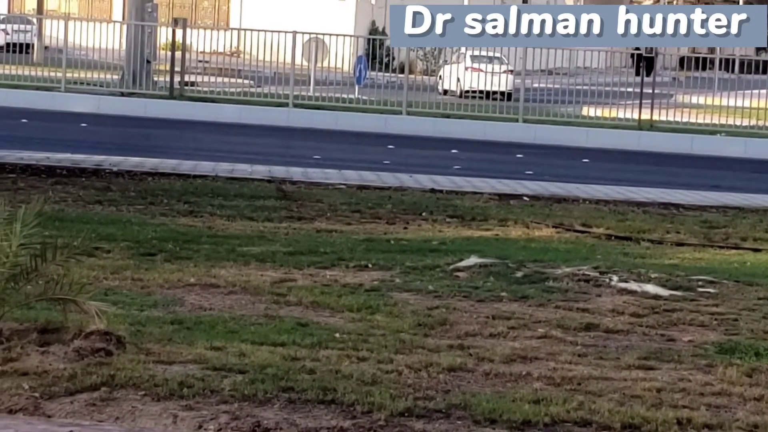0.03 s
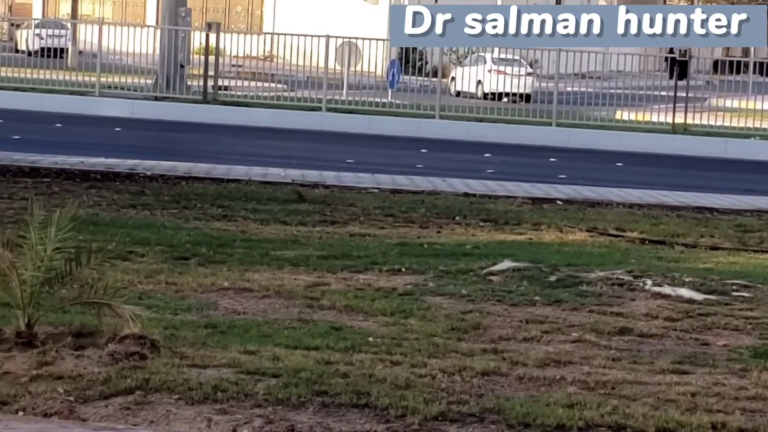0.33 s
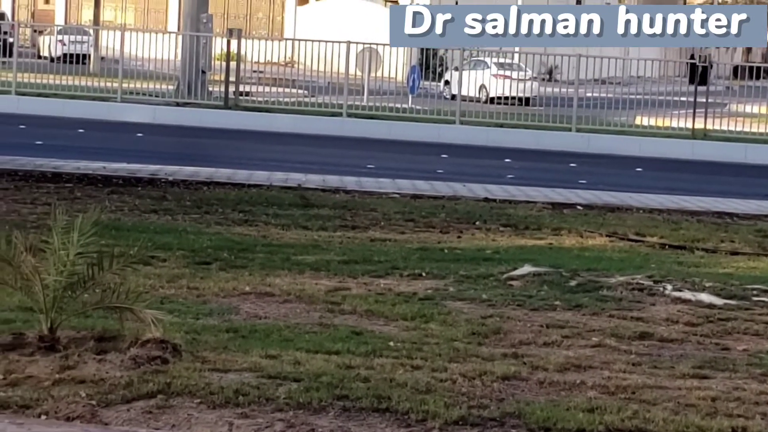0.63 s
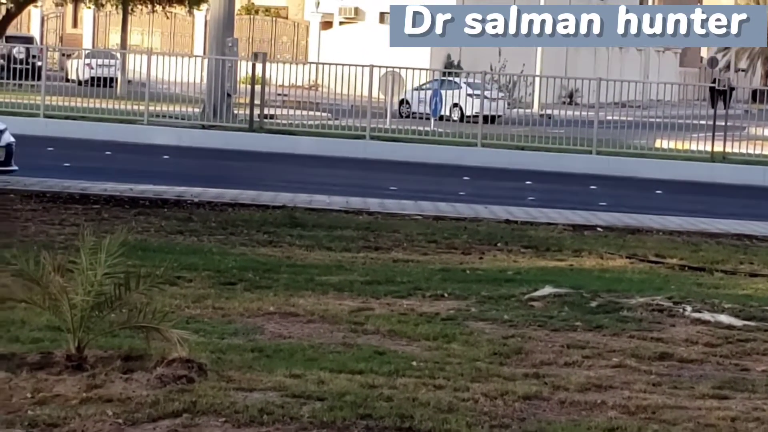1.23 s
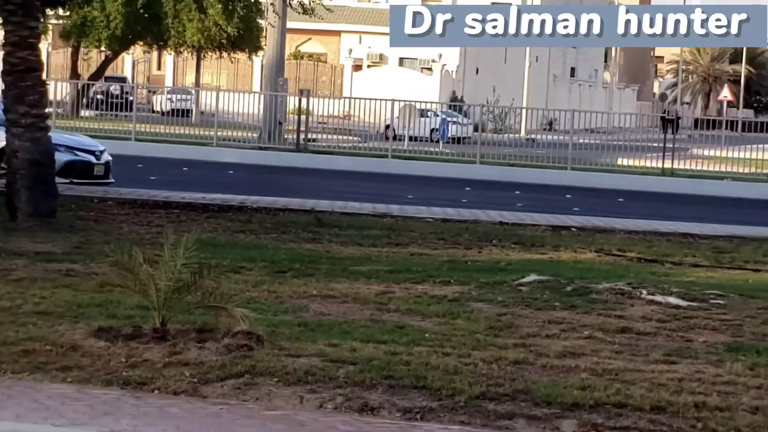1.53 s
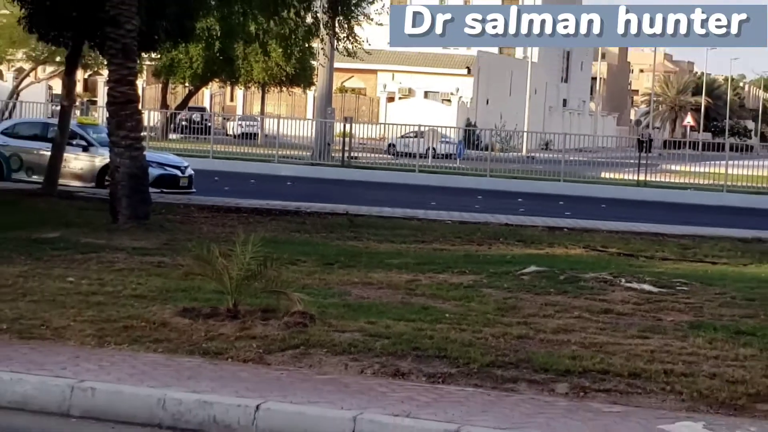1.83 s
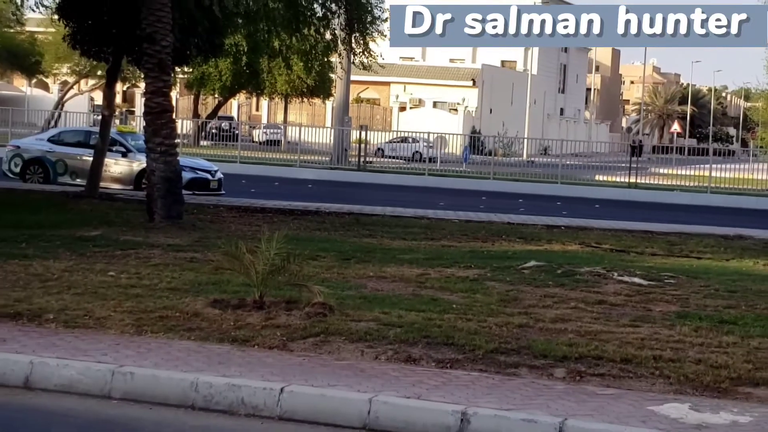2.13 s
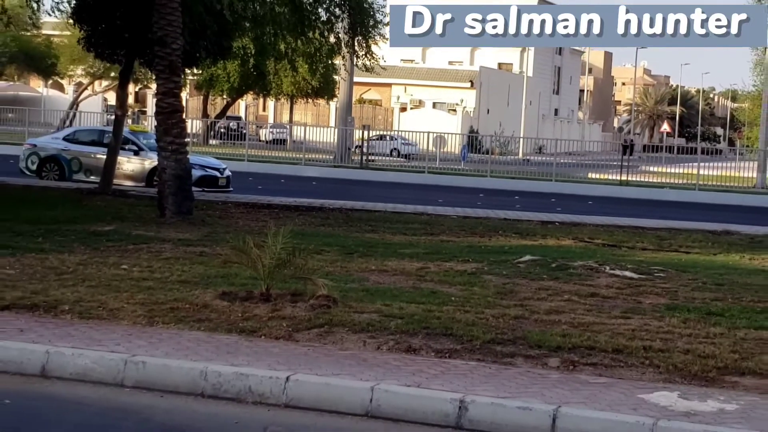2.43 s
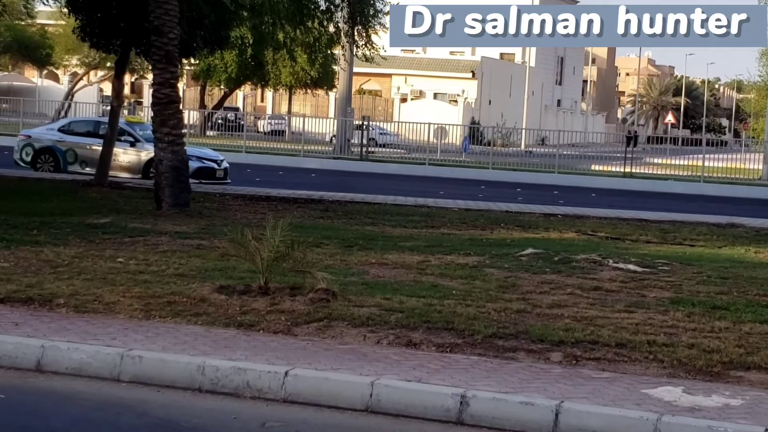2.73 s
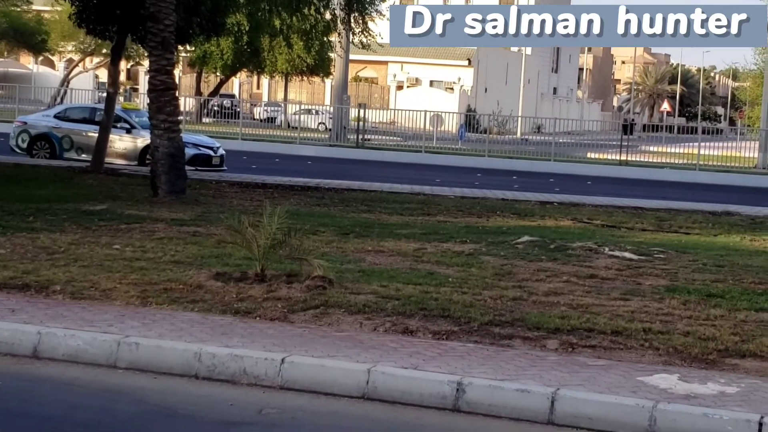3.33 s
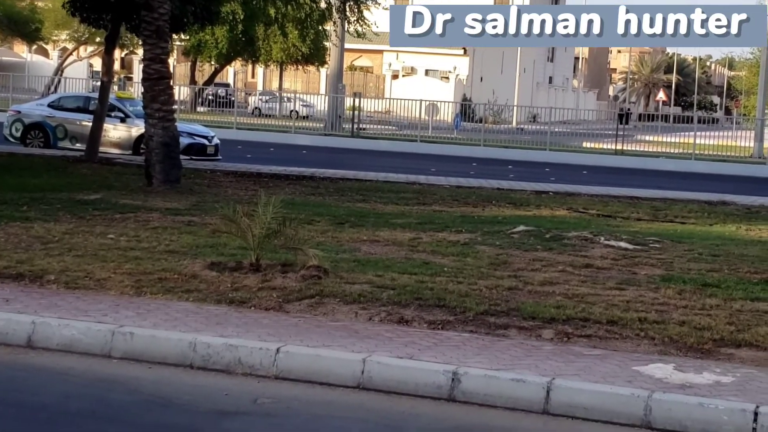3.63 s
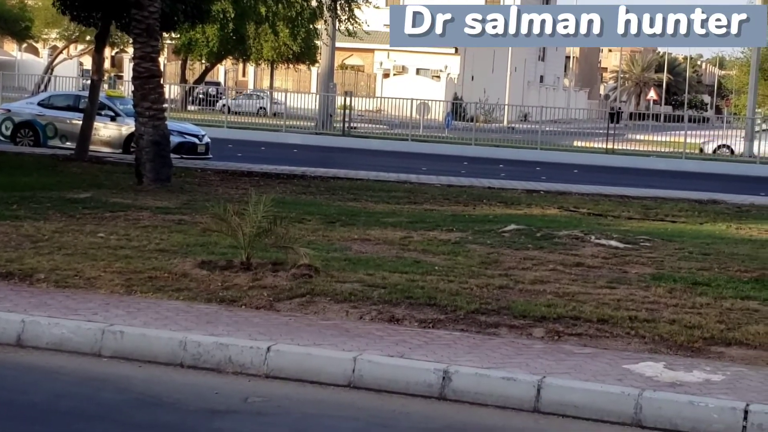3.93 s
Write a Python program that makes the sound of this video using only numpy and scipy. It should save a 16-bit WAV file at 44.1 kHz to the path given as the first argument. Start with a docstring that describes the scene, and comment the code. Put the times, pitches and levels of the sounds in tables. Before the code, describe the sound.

Wind buffets the microphone with low thumps over a steady rumble of distant traffic.

```python
"""A light wind buffets the two microphone ports of a phone beside a town road, mostly the right one.
From the start, distant traffic rumbles and hisses from all round and a far engine hums. Single eddies
soon thump, and birds chirp faintly between the house fronts. Near 1.6 s and again near 2.8 s the tyres
of a slow car swell, and just after each a hard thump comes with a short tick on the right.
Around 3.4 s the engine is at its loudest and the clearest chirp rings out."""
import sys
import numpy as np
from scipy import signal
from scipy.fft import rfft, irfft
from scipy.io import wavfile

SR = 44100
rng = np.random.default_rng(int(sys.argv[2]) if len(sys.argv) > 2 else 0)


def pcm_store(signal):
    """Save signal as 16-bit PCM."""
    levels = np.round(np.clip(np.atleast_2d(signal), -1, 1) * 32767)
    wavfile.write(sys.argv[1], SR, levels.astype(np.int16).T)


N = 176400


def undb(db):
    """Decibels to gain."""
    return 10 ** (np.asarray(db) / 20)


def unit(x):
    """Scale to rms 1."""
    return x / np.sqrt(np.mean(x ** 2))


def curve(rows):
    """Join (time_s, value) rows by straight lines."""
    return np.interp(np.arange(N) / SR, *np.array(rows).T)


def colour(x, points):
    """Equalise by (freq_hz, gain_db) points, then scale to rms 1."""
    hz, db = np.array(points).T
    bins_hz = np.maximum(np.arange(N // 2 + 1) * SR / N, 1)
    gain = undb(np.interp(np.log(bins_hz), np.log(hz), db))
    return unit(irfft(rfft(x) * gain, N))


def stereo_noise(points):
    """Independent coloured noise for left and right, each at rms 1."""
    return np.array([colour(rng.standard_normal(N), points) for _ in range(2)])


def delay(x, seconds):
    """Circular delay by any fraction of a sample."""
    bins_hz = np.arange(N // 2 + 1) * SR / N
    return irfft(rfft(x) * np.exp(-2j * np.pi * bins_hz * seconds), N)


def drift(rate_hz):
    """Smooth random drift with spread 1."""
    bins_hz = np.arange(N // 2 + 1) * SR / N
    lowpass = np.exp(-(bins_hz / rate_hz) ** 2) * (bins_hz > 0)
    return unit(irfft(rfft(rng.standard_normal(N)) * lowpass, N))


def swell(age):
    """Bell-shaped envelope; age counts half lengths from its peak."""
    return np.exp(-age ** 2 / 2)


def wind(eddies_per_s=260, spread_db=6, boost_db=2):
    """Small eddies give each port a stream of pressure kicks, sized by the gusts."""
    # gust strength at each port: time_s, level_db
    gusts_left = [(0, -38), (.6, -47), (1.25, -53), (1.4, -40), (1.6, -44), (2.3, -51.5), (2.53, -41),
                  (2.7, -44.5), (3.3, -41), (3.43, -33.5), (3.6, -46.5), (3.9, -56), (3.95, -35),
                  (4.0, -37)]
    gusts_right = [(0, -48.5), (.08, -30), (.16, -37.5), (.25, -40), (.34, -46.5), (.62, -34.5),
                   (.72, -43.5), (.8, -35.5), (.92, -40.5), (1.2, -64), (1.39, -42), (1.49, -42.5),
                   (1.57, -27.5), (1.68, -31.5), (1.86, -34), (1.98, -32), (2.1, -38), (2.3, -35),
                   (2.55, -51), (2.65, -39.5), (2.76, -34), (2.93, -37), (3.08, -46), (3.3, -41),
                   (3.47, -37.5), (3.55, -39), (3.64, -32.5), (3.73, -52), (3.85, -50), (3.89, -32.5),
                   (4.0, -33)]
    # bass-heavy spectrum of the buffeting: freq_hz, gain_db
    buffet_eq = [(18, -45), (30, -25), (52, 5.5), (90, 0.5), (135, -6), (200, -14), (300, -27),
                 (500, -41.5), (1200, -61), (4000, -96.5)]
    ports = []
    for gusts in (gusts_left, gusts_right):
        hits = rng.random(N) < eddies_per_s / SR
        kicks = hits * rng.choice([-1, 1], N) * undb(spread_db * rng.standard_normal(N))
        ports.append(colour(kicks, buffet_eq) * undb(curve(gusts) + boost_db))
    return np.array(ports)


def traffic(streams=12, swell_db=0.6, left_bias_db=4.5, port_spacing_m=0.14):
    """Streams of far cars from all round swell on their own and reach the two ports at different times."""
    # tyre roar over engine rumble: freq_hz, gain_db
    roar_eq = [(20, -23.5), (45, 3.5), (70, 4.5), (120, -2.5), (180, -3), (250, -7.5), (350, -12),
               (480, -19), (650, -21), (900, -16), (1300, -19), (2000, -19.5), (2250, -26), (2600, -39.5),
               (3300, -46.5), (5500, -50.5), (7500, -63.5), (9000, -85), (15000, -79.5)]
    # tone of the left port against the right: freq_hz, gain_db
    left_eq = [(150, 0), (520, 2), (900, 1.5), (1300, 0.5), (1900, -3), (2900, 0)]
    # loudness of the traffic bed: time_s, level_db
    fader = [(0, -43.5), (.8, -44.5), (2.2, -44), (3.3, -44), (4.0, -43)]
    left, right = np.zeros((2, N))
    for side in np.cos(np.pi * (np.arange(streams) + .5) / streams):  # +1 is right, -1 is left
        roar = colour(rng.standard_normal(N), roar_eq)
        stream = roar * undb(swell_db * drift(1.8) - left_bias_db * side)
        left += delay(stream, side * port_spacing_m / 343)  # sound travels at 343 m/s
        right += stream
    return np.array([colour(left, left_eq), unit(right)]) * undb(curve(fader))


def sizzle(left_minus_right_db=7):
    """A faint high hiss leaning left, brightest at the very start, then coming and going."""
    # spectrum of the sizzle: freq_hz, gain_db
    sizzle_eq = [(1500, -23), (2600, -3.5), (3600, 4), (4500, -2), (5500, -8), (7600, -4.5), (8500, -27),
                 (14000, -36.5)]
    # loudness of the sizzle: time_s, level_db
    fader = [(0, -78), (.25, -83), (.45, -85), (1.8, -89.5), (2.4, -83.5), (2.8, -82.5), (3.1, -82.5),
             (4.0, -82)]
    pan_db = np.array([[.5], [-.5]]) * left_minus_right_db
    return stereo_noise(sizzle_eq) * undb(curve(fader) + pan_db)


def wavering_tone(pitch_hz, waver):
    """A sine near rms 1 that flutters in level and wanders in pitch by the fraction waver."""
    pitch = pitch_hz * (1 + waver * drift(14))
    tone = np.sqrt(2) * np.sin(2 * np.pi * np.cumsum(pitch) / SR)
    return tone * undb(1.4 * drift(2.8))


def far_engine(whine_db=-74):
    """A wavering exhaust hum with a faint whine above it."""
    # loudness of the hum: time_s, level_db
    fader = [(0, -61), (.7, -62.5), (1.08, -55), (1.35, -62), (1.7, -56.5), (2.2, -62.5), (2.9, -64),
             (3.3, -52), (3.6, -54), (4.0, -71)]
    hum = wavering_tone(pitch_hz=261.3, waver=.035) * undb(curve(fader))
    whine = wavering_tone(pitch_hz=867, waver=.008) * undb(whine_db)
    return hum + whine


def eddy_thumps(t, core_width=0.39, core_db=-13.5):
    """Each strong eddy pushes, sucks and pushes again as it crosses a port; its tight core adds a knock."""
    # strong eddies: centre_s, half_length_ms, level_db, left_minus_right_db, skew
    eddies = [(.219, 2.24, -23, -18, -0.12), (.234, 2.9, -25.5, -20, 1.3), (.787, 3.6, -24.5, -18, 0.15),
              (.822, 3.3, -28.5, -15, .9), (1.579, 2.4, -21, -20, -0.065), (1.66, 2.93, -13, -27, -0.25),
              (1.682, 1.67, -22.5, -25, 0.49), (1.7128, 2.2, -17, -34.5, -0.41),
              (1.765, 2.3, -25.5, -24, -0.97), (1.946, 1.86, -24.5, -31, -1.8),
              (2.008, 3.4, -25, -22, 0.29), (2.6466, 3, -19.5, -31, 0.2), (2.911, 2.3, -22.5, -21, -0.65),
              (2.94, 2.5, -24.5, -18, 0.9), (2.9533, 2.6, -11.5, -39, 0.97), (3.429, 2.9, -19.5, 5.5, -0.3),
              (3.645, 1.74, -20.5, -14, -0.6), (3.8924, 2.6, -18.5, -20, .5),
              (3.908, 1.86, -24.5, -27, 1.4)]
    swirl = lambda age, skew: (age ** 2 - 1 - skew * age) * swell(age)
    out = np.zeros((2, N))
    for centre_s, half_length_ms, level_db, pan_db, skew in eddies:
        age = (t - centre_s) / (half_length_ms / 1000)
        core = undb(core_db) * swirl(age / core_width, skew)  # width and level relative to the eddy
        port_db = np.minimum([[pan_db], [-pan_db]], 0)  # only the weaker port is turned down
        out += undb(level_db + port_db) * (swirl(age, skew) + core)
    return out


def birds(t, fall_hz=44.8, rasp=.046, rasp_hz=400, echo_t60_s=0.17, echo_db=4):
    """Short raspy falling chirps, smeared by echoes from the houses."""
    # bird chirps: centre_s, pitch_hz, level_db, half_length_s
    chirps = [(.33, 3200, -87, .015), (.65, 4100, -87, .015), (0.748, 4150, -87, 0.011),
              (1.023, 3650, -84, .016), (1.282, 4000, -83, .018), (2.55, 3830, -85, .02),
              (2.8, 3590, -82, .04), (3.413, 3365, -67.5, 0.014), (3.448, 3380, -75, 0.014)]
    song = np.zeros(N)
    for centre_s, pitch_hz, level_db, half_length_s in chirps:
        age = (t - centre_s) / half_length_s
        pitch = pitch_hz * (1 + rasp * drift(rasp_hz)) - fall_hz * age  # one fall_hz per half length
        song += undb(level_db) * swell(age) * np.sin(2 * np.pi * np.cumsum(pitch) / SR)
    tails = rng.standard_normal((2, N)) * np.exp(-np.log(1000) * t / echo_t60_s)
    echoes = np.array([signal.fftconvolve(song, tail / np.linalg.norm(tail))[:N] for tail in tails])
    return song + undb(echo_db) * echoes


def near_cars(t):
    """The tyre hiss of each slow car swells and fades."""
    # slow cars nearby: centre_s, half_length_s, level_db, left_minus_right_db
    cars = [(1.554, 0.082, -68.5, 5), (2.769, .17, -74, 7.5)]
    # spectrum of their tyres: freq_hz, gain_db
    tyre_eq = [(1200, -24), (2300, 3.5), (2850, -2.5), (3300, -13.5), (6000, -39.5)]
    envelope = np.zeros((2, N))
    for centre_s, half_length_s, level_db, pan_db in cars:
        port_db = np.array([[.5], [-.5]]) * pan_db
        envelope += swell((t - centre_s) / half_length_s) * undb(level_db + port_db)
    return stereo_noise(tyre_eq) * envelope


def ticks(t, knock_hz=510, knock_half_length_s=.0015):
    """Two short ticks with a hollow knock on the right, during the hardest thumps."""
    # ticks and their knocks: centre_s, half_length_s, tick_db, knock_db
    hits = [(1.6613, .0004, -59, -45.5), (2.951, .004, -66, -38)]
    # spectrum of the ticks: freq_hz, gain_db
    tick_eq = [(200, 0), (700, 11.5), (2000, 4.5), (7000, -6), (14000, -9)]
    noise = colour(rng.standard_normal(N), tick_eq)
    out = np.zeros((2, N))
    for centre_s, half_length_s, tick_db, knock_db in hits:
        age_s = t - centre_s
        tick = swell(age_s / half_length_s) * noise
        knock = swell(age_s / knock_half_length_s) * np.cos(2 * np.pi * knock_hz * age_s)
        out[1] += undb(tick_db) * tick + undb(knock_db) * knock
    return out


def scene():
    """Wind at the ports over the sounds of the town."""
    t = np.arange(N) / SR
    bed = wind() + traffic() + sizzle()
    return bed + near_cars(t) + far_engine() + eddy_thumps(t) + birds(t) + ticks(t)


def record(dry, hiss_db=-77.5, top_hz=14550):
    """The phone adds a faint hiss and cuts the top."""
    # microphone hiss: freq_hz, gain_db
    hiss_eq = [(3000, -0.5), (7300, -5.5), (8400, -20), (9600, -8), (11500, 4), (14500, 4)]
    hiss = stereo_noise(hiss_eq) * undb(hiss_db)
    lowpass = signal.ellip(10, .2, 80, top_hz, fs=SR, output="sos")
    return signal.sosfilt(lowpass, dry + hiss)


dry = scene()
out = record(dry)
pcm_store(out)
```